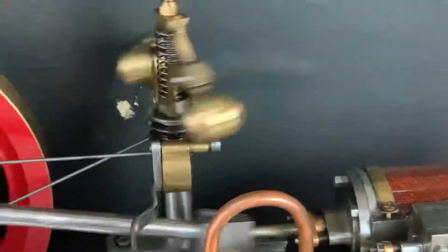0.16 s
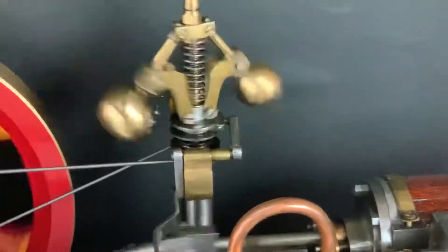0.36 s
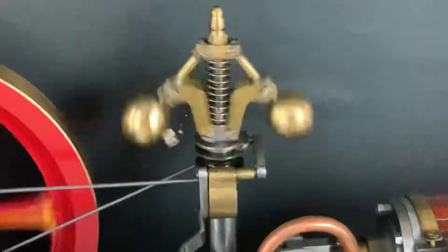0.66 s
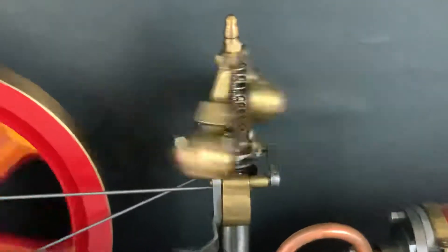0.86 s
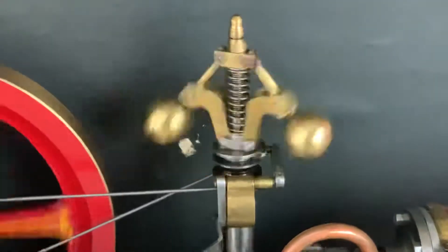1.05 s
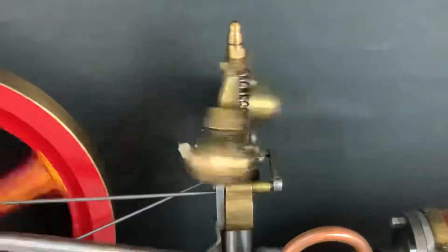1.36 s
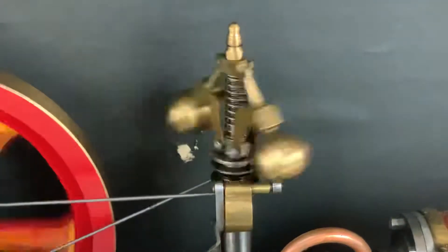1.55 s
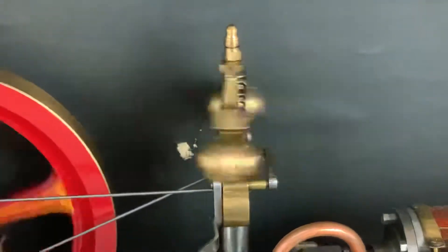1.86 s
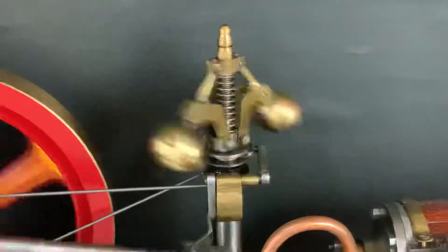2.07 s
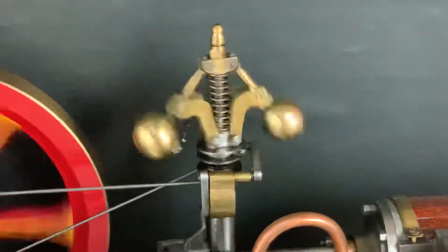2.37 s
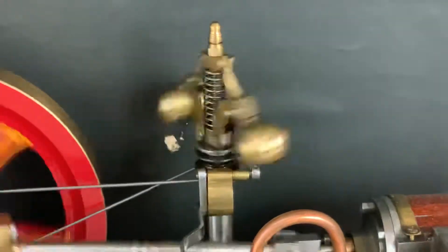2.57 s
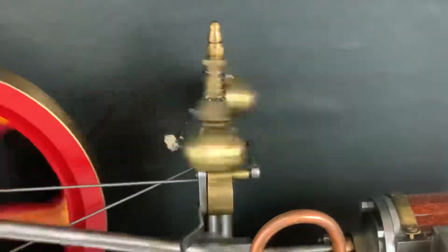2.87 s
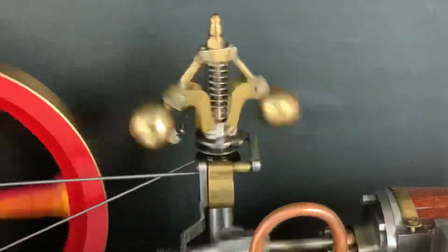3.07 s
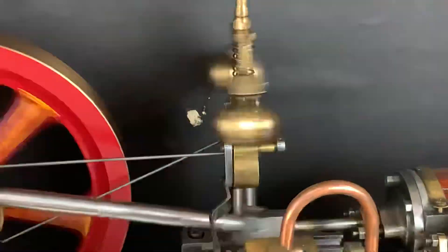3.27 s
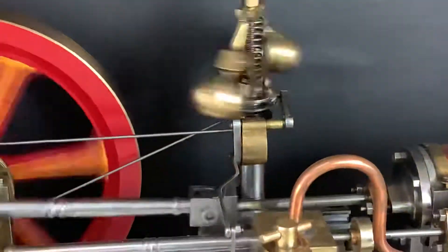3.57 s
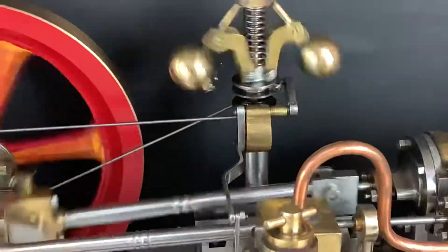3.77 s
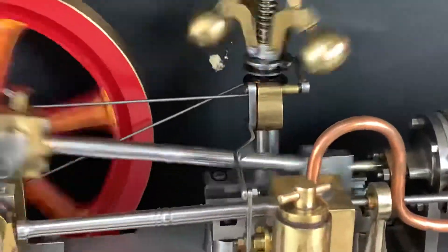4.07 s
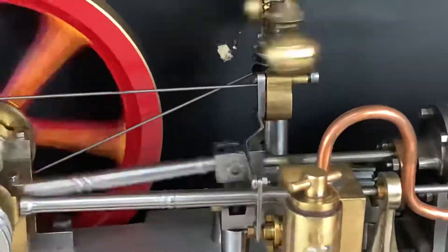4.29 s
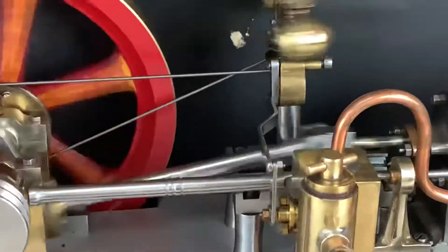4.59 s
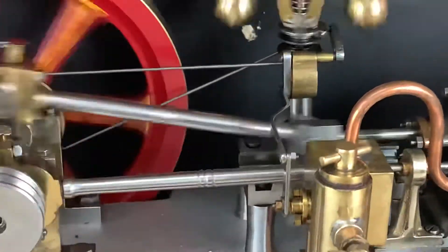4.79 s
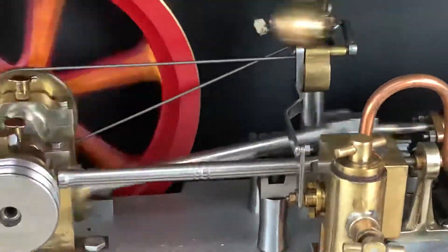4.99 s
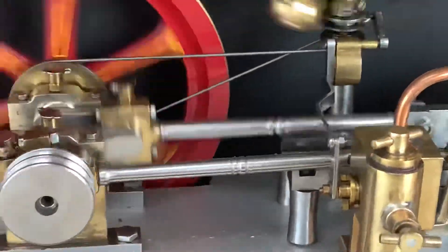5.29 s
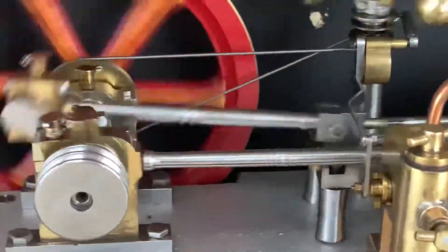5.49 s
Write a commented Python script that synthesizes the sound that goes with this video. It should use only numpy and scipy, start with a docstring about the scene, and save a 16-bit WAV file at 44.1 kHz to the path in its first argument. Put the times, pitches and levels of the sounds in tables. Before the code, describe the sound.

A small brass and steel model engine runs on a wooden table, recorded very close in stereo, indoors and dry. About two and a half turns per second, each a low woody thump, then a metallic tap, loose knocks and a clack. Underneath, gears whirr roughly, shafts and belt give a broad low rumble, and leaking air hisses to the right.

```python
"""On a wooden table, close to a phone with two ports, a small brass model steam engine runs.
Each crank turn brings a thump, a tap and a clack with loose knocks between. Timed force pushes ring
decaying modes of table top, legs and metal frame. Gears whirr as noise through narrow flickering resonances;
shafts, belt and room make a broad coloured noise, and an air leak hisses to the right in drifting bands."""
import sys
import numpy as np
from scipy import signal
from scipy.fft import rfft, irfft
from scipy.io import wavfile
from scipy.ndimage import uniform_filter1d

SR = 44100
rng = np.random.default_rng(int(sys.argv[2]) if len(sys.argv) > 2 else 0)


def digitize_waveform(pressure):
    """Quantize a signal to 16-bit integers and store it at the path in sys.argv[1].

    Rows of a 2-D input are taken as channels; values are limited to [-1, 1].
    """
    field = np.atleast_2d(pressure).T
    bounded = np.clip(field, -1, 1)
    quanta = np.round(bounded * 32767).astype(np.int16)
    wavfile.write(sys.argv[1], SR, quanta)


N = 248724
PRE = SR // 10  # samples of run-up, so that earlier blows ring on

# crank turns: thump_s, thump_db, clack_s, clack_db, strength_db (of the other knocks, taps and shoves)
TURNS = [(-0.0315, 0, 0.2048, -25, -1), (0.3367, -9.5, 0.5844, -25, -1.7),
         (0.7332, -0.2, 1.0012, -27, -1.5), (1.1489, 0.5, 1.4098, -24, -1.9),
         (1.5534, 0, 1.806, -25.5, -2.1), (1.946, -0.2, 2.1943, -26, -1.4),
         (2.3322, -0.1, 2.5789, -25.5, -1.1), (2.7148, -0.2, 2.9597, -25, -0.3),
         (3.0959, -0.2, 3.3422, -25.5, -0.4), (3.4787, -0.1, 3.7234, -25, 0.1),
         (3.8588, 0.9, 4.1027, -24, 0.3), (4.2379, 0, 4.4829, -25.5, 0), (4.6188, 0.4, 4.8643, -25, 0),
         (5.0002, 0.7, 5.246, -23.5, -0.1), (5.3822, 0.1, 5.6275, -26.5, -0.3)]
# crank angle of thump, valve, mid-stroke, crosshead and return: angle [share of a turn]
STAGES = [0, 0.1977, 0.429, 0.644, 0.736]


def amp(db):
    """Gain for a level in dB."""
    return 10 ** (np.asarray(db) / 20)


def level(x, db):
    """Scale to an RMS level in dB."""
    return x * amp(db) / np.sqrt(np.mean(x ** 2))


def ring(x, hz, t60):
    """One mode driven by x: a sine that falls 60 dB in t60 seconds."""
    pole = np.exp((2j * np.pi * hz - np.log(1000) / t60) / SR)
    return signal.lfilter([1], [1, -pole], x + 0j).imag[-N:]


def blows(times, sizes, push_s):
    """Raised-cosine force pushes of unit area times their size, with the run-up ahead."""
    force = np.zeros(N + PRE)
    at = np.round(np.asarray(times) * SR).astype(int) + PRE
    keep = (at >= 0) & (at < N + PRE)
    np.add.at(force, at[keep], np.asarray(sizes)[keep])
    push = np.hanning(int(push_s * SR) + 3)
    return np.convolve(force, push / push.sum())[:N + PRE]


def late(x, samples, turn=0.):
    """Delay by a fraction of samples, with an optional phase lead in radians."""
    return irfft(rfft(x) * np.exp(1j * turn - 2j * np.pi * np.fft.rfftfreq(N) * samples), N)


def coloured(points):
    """Noise with a spectrum drawn through (Hz, dB) points."""
    hz, db = np.transpose(points)
    shape = np.interp(np.log(np.fft.rfftfreq(N, 1 / SR) + 1), np.log(hz), db)
    return irfft(rfft(rng.standard_normal(N)) * amp(shape), N)


def walk(rate):
    """Random levels held 1 / rate s and smoothed twice, of about unit spread."""
    hold = int(SR / rate)
    steps = np.repeat(rng.standard_normal(N // hold + 1), hold)
    return 4 / 3 * uniform_filter1d(uniform_filter1d(steps, hold), hold)[:N]


def moments(angle):
    """When the crank passes this angle in each turn; it moves evenly between thumps and clacks."""
    thump, _, clack = np.transpose(TURNS)[:3]
    end = thump[-1] + (clack[-1] - thump[-1]) / STAGES[3]
    turns = np.arange(len(TURNS))
    known_angles = np.append(np.ravel([turns, turns + STAGES[3]], "F"), len(TURNS))
    known_s = np.append(np.ravel([thump, clack], "F"), end)
    return np.interp(turns + angle, known_angles, known_s)


def table():
    """Each stage of the turn passes its own few knocks into the table; harder knocks favour the high modes."""
    # knocks passed into the table: stage [index], delay_s, force_db, hardness [dB per octave], direction [sign]
    knocks = [(0, 0.0004, -23.8, -3, 1), (0, 0.0258, -50.9, 27, -1), (1, -0.0051, -52.1, 30, 1),
              (1, -0.0007, -47.8, 30, 1), (1, 0.0051, -39.9, 21, 1), (1, 0.0123, -31.1, -6, 1),
              (1, 0.0153, -47.5, 30, 1), (1, 0.0249, -51.0, 27, 1), (1, 0.0291, -38.7, -6, -1),
              (1, 0.0637, -54.1, 30, -1), (2, -0.004, -50.5, 30, -1), (2, 0.0032, -34.2, 9, 1),
              (2, 0.0078, -38.7, 24, -1), (2, 0.016, -32.4, 0, -1), (2, 0.022, -41.5, 6, -1),
              (2, 0.0434, -55.4, 30, -1), (3, -0.0037, -48.4, 30, -1), (3, 0.0003, -40.4, 24, 1),
              (3, 0.0033, -31.7, -6, 1), (3, 0.0065, -45.0, 30, 1), (3, 0.0141, -52.6, 30, -1),
              (4, -0.0112, -49.6, 30, -1), (4, -0.0038, -41.2, 0, -1), (4, 0.0004, -43.0, 24, 1),
              (4, 0.004, -33.3, 9, 1), (4, 0.0102, -41.7, 12, 1), (4, 0.0592, -51.7, 27, -1),
              (4, 0.0714, -39.3, 3, -1), (0, -0.0044, -41.4, 30, -1), (0, -0.0014, -43.3, 27, -1)]
    # knocks of the first three turns, at their own times:
    # time_s, force_db, hardness [dB per octave], direction [sign]
    timed_knocks = [(0.0405, -42.2, 30, -1), (0.0459, -30, 12, -1), (0.0468, -43.5, 30, -1),
                    (0.0524, -44.2, 30, -1), (0.0596, -28.7, 0, 1), (0.2071, -32.8, 0, -1),
                    (0.4154, -34, 22, 1), (0.4221, -30.1, 0, 1), (0.4279, -28.1, 0, 1),
                    (0.5071, -41.8, 30, 1), (0.5163, -38.7, 20, -1), (0.8169, -39.8, 20, 1),
                    (0.8263, -44.7, 30, 1), (0.829, -32, 4, 1), (0.8348, -32.8, 0, 1)]
    # table top modes: pitch_hz, t60_s, level_db, sign, left_lead [radians]
    modes = [(195, 0.127, 4.4, -1, 0.0), (224, 0.225, 7.1, 1, 0.0), (267, 0.073, -1.9, 1, 0.0),
             (287, 0.112, -7.5, 1, 0.1), (353, 0.101, -14.8, 1, 0.2), (456, 0.099, -19.1, -1, 0.5),
             (515, 0.025, -22.7, 1, 0.7)]
    gain_db, scatter_db, push_s, low_cut_hz = .8, 0.4, .0013, 165

    _, thump_db, _, _, knock_db = np.transpose(TURNS)
    rows = []
    for stage, delay, force, hard, way in knocks:
        turn_db = knock_db if stage else thump_db
        times = moments(STAGES[int(stage)]) + delay
        rows.append(np.broadcast_arrays(times, force + turn_db, hard, way))
    s, db, hard, way = np.concatenate(rows + [np.transpose(timed_knocks)], axis=1)
    db = db + gain_db + scatter_db * rng.standard_normal(len(s))

    out = 0
    for hz, t60, mode_db, sign, turn in modes:
        sizes = way * amp(db + mode_db + hard * np.log2(hz / 224))
        mode = sign * ring(blows(s, sizes, push_s), hz, t60)
        left = amp(.8 * (hz > 250))  # higher modes lean left, against the balance set in scene()
        out = out + np.array([mode * left, late(mode, 0, -turn) / left])
    # the small top sends little into the air below its lowest mode
    return signal.sosfiltfilt(signal.butter(5, low_cut_hz, "high", fs=SR, output="sos"), out)


def legs():
    """Slow shoves of piston and crank rock the table legs."""
    # table leg modes: pitch_hz, t60_s
    modes = [(48, 0.15), (75, 0.086), (115, 0.18), (138, 0.11)]
    # shoves of the moving masses: angle [share of a turn], direction [sign], then level_db into each leg mode
    shoves = [(0.015, -1, -34, -30.5, -31.5, -42), (0.206, -1, -43, -37.5, -30, -30),
              (0.468, 1, -40, -49, -27, -44), (0.752, 1, -44, -50, -28, -48)]
    shove_s = 0.0066
    strength = np.transpose(TURNS)[4]
    out = 0
    for angle, way, *mode_dbs in shoves:
        for db, (hz, t60) in zip(mode_dbs, modes):
            force = blows(moments(angle), np.sign(way) * amp(db + strength), shove_s)
            out = out + ring(force, hz, t60)
    return out


def strikes():
    """Taps, clacks and ticks of every turn: time s, dB, and whether the blow is a light one."""
    # light linkage ticks of each turn: angle [share of a turn], level_db
    ticks = [(0.082, -35.5), (0.298, -33), (0.358, -34.5), (0.44, -53.5), (0.567, -41), (0.765, -38.5),
             (0.836, -37.5), (0.925, -49.5)]
    tap_db, tap_scatter_db = -31.5, 0.5  # the valve gear taps once a turn
    tick_scatter_db, tick_scatter_s = 1.5, 0.00056

    _, _, clack_s, clack_db, strength = np.transpose(TURNS)
    chance = rng.standard_normal((len(TURNS), len(ticks) + 1, 2)).T
    taps = (moments(STAGES[1]), tap_db + strength + tap_scatter_db * chance[0, -1], False)
    rows = [taps, (clack_s, clack_db, False)]
    for k, (angle, db) in enumerate(ticks):
        times = moments(angle) + tick_scatter_s * chance[1, k]
        rows.append((times, db + tick_scatter_db * chance[0, k], True))
    return np.concatenate([np.broadcast_arrays(*row) for row in rows], axis=1)


def frame():
    """Metal on metal: each blow rebounds and rattles out; clacks and taps ring the frame otherwise than ticks do."""
    # brass and steel frame modes: pitch_hz, t60_s, heavy_blow_db, light_tick_db, left_lead [radians]
    modes = [(506, 0.072, -14.5, -6, 0.4), (642, 0.037, -12, -37, 0.82), (890.5, 0.038, -4.5, -1, 0.51),
             (1033, 0.025, 1, -8, 1.25), (1282.4, 0.044, -5, -3.5, 1.14), (1567, 0.061, -3.5, -19, 2.37),
             (1840, 0.05, -9, -25, 2.86), (2210, 0.023, 3, -38, 0.64), (2320, 0.0079, 1.5, 3, 1)]
    rebounds = [(.003, 0.00036, 0.4), (.009, 0.000823, 0.48), (.022, 0.004, 0.22)]  # after s, spread s, share

    s, db, light = strikes()
    colour = rng.standard_normal((len(s), len(modes)))  # dB, so that no two blows sound alike
    bounce = rng.standard_normal((len(s), len(rebounds)))
    out = 0
    for k, (hz, t60, heavy_db, light_db, turn) in enumerate(modes):
        size = (-1) ** k * amp(db + np.where(light, light_db, heavy_db) + colour[:, k])
        force = blows(s, 0.86 * size, 0.0001)
        for j, (after_s, spread_s, part) in enumerate(rebounds):
            force = force + blows(s + after_s + spread_s * bounce[:, j], part * size, 0.00026)
        mode = ring(force, hz, t60)
        out = out + np.array([mode, late(mode, 0, -turn)])
    return out


def whirr():
    """Rough rubbing of gears and bearings rings the frame resonances, each flickering by itself."""
    # rubbed resonances: pitch_hz, width_hz, level_db (per root Hz of width, relative),
    # left_lead [radians], move_gain_db (per unit of phone movement)
    resonances = [(513, 53, -11, 0.34, 2.5), (904, 33, -11.5, 0.78, 4.5), (1355, 150, -21, 0.56, 1),
                  (1609, 70, -7, 2.56, -4), (1780, 140, -14.5, 3.93, 5), (2171, 42.5, -4.5, 1.1, 3.5),
                  (2510, 39, -2.5, 0.55, -9), (2630, 63, -7, 3.8, -4), (2689, 19.4, 3.5, 1.07, -5),
                  (2712, 79, -1, 4.37, -4.5), (2955, 27, -9, 6.3, 6), (3177, 43, -2, 1.6, -4.5),
                  (3390, 174, -6.5, 2.2, -0.5), (3810, 74, -7.5, 4, -10), (3975, 51, -3, 1.72, 5.5),
                  (4357, 35, 1, 0.51, 1.5), (4520, 43, 0, 3.3, -2), (4743, 29, -3.5, 0.091, -3),
                  (5100, 90, -15, 3.2, 2), (5220, 32, -7.5, 0.85, -5), (5430, 150, -22, 2.5, 0),
                  (5850, 55, -13.5, 0.83, 11), (6180, 64, -10.5, 0.51, 5.5)]
    # movement of the phone along the engine: time_s, position [share of the way]
    move = [(0, -0.4), (.5, 0.076), (3, 0.18), (4.2, 0.76), (5.64, 1)]
    whirr_db, shared = -36, 0.95  # shared: part of the power common to both ports
    swell_db, swell_at = 0.25, 0.33  # swells once a turn, most at this crank angle

    t = np.arange(N) / SR
    moved = np.interp(t, *np.transpose(move))
    out = 0
    for hz, width, db, turn, gain_db in resonances:
        t60 = np.log(1000) / np.pi / width
        near = level(ring(rng.standard_normal(N), hz, t60), 0)
        loose = level(ring(rng.standard_normal(N), hz, t60), 0)
        common = np.sqrt(shared) * np.array([late(near, 0, turn), near])
        opposed = np.sqrt(1 - shared) * np.array([loose, -loose])
        flicker = amp(db + 1.95 * walk(14) + gain_db * moved)
        out = out + flicker * np.sqrt(width) * (common + opposed)
    angle = np.interp(t, moments(swell_at), np.arange(len(TURNS)))
    return level(out * amp(swell_db * np.cos(2 * np.pi * angle)), whirr_db)


def running():
    """Shafts, belt and room: one bass feeds both ports; above it part comes from the left, part from all round."""
    # broad running noise: pitch_hz, level_db (per Hz, relative)
    colour = [(25, -17), (44, -6), (55, -10), (80, -11), (115, -6.5), (158, -7), (215, -2), (400, -15.5),
              (680, -25), (1300, -12), (1650, -27), (1900, -24), (2500, -11), (4500, -8.5), (5300, -13),
              (5700, -8.5), (6800, -14), (10000, -22)]
    run_db, left_lead = -35.5, 12.7  # left_lead in samples

    near = coloured(colour)
    bass = signal.butter(2, 900, fs=SR, output="sos")
    treble = signal.butter(2, 900, "high", fs=SR, output="sos")
    low = signal.sosfiltfilt(bass, near) * amp(2.1 * walk(21))
    high = signal.sosfiltfilt(treble, near) * amp(2.3 * walk(24.94))
    airy = signal.butter(2, 2600, "high", fs=SR, output="sos")
    all_round = signal.sosfilt(airy, [coloured(colour), coloured(colour)])
    opposed = amp(-7.0) * coloured(colour)  # opposite in the two ports
    left = amp(8.0) * low + high + opposed
    right = amp(11.5) * low + late(high, left_lead) - opposed
    return level(np.array([left, right]) + amp(3.5 + 1.9 * walk(40)) * all_round, run_db)


def leak():
    """Escaping air, off to the right, each band drifting and flickering by itself."""
    # hiss colour: pitch_hz, level_db (per Hz, relative)
    colour = [(2500, -30), (5000, -9), (7000, -6), (8500, -5), (10200, -3), (11800, -1.5), (13200, 0),
              (14200, -3.5), (16000, -4)]
    # strength of the flow: time_s, level_db
    flow = [(0, -33.5), (1.5, -33.5), (2.999, -34), (3.8, -34), (4.8, -32.5), (5.64, -31.5)]
    # phase by which the right port leads: pitch_hz, lead [cycles]
    right_lead = [(0, 0), (5300, 1.5), (6500, 1.97), (7750, 2.3), (8700, 2.5), (9750, 2.87), (10750, 3.13),
                  (11800, 3.5), (12950, 3.86), (13750, 4.08), (14900, 4.5), (22050, 6.75)]
    # added right lead in the bands below 8.5 kHz as the phone moves: time_s, lead [cycles]
    lead_shift = [(0, 0), (3, 0), (4, -.13), (5.64, -.2)]
    # band edges: edge_hz
    edges = [2000, 4500, 6200, 8500, 10500, 12000, 13500, 16500]
    # right port over left in each band: right_db
    right_dbs = [-2, 12.5, 7.5, -2, 0.8, -1.5, 0.7]

    t, hz = np.arange(N) / SR, np.fft.rfftfreq(N, 1 / SR)
    air = rfft(coloured(colour))
    lagged = air * np.exp(-2j * np.pi * np.interp(hz, *np.transpose(right_lead)))
    shift = 2 * np.pi * np.interp(t, *np.transpose(lead_shift))
    out = 0
    for lo, hi, right_db in zip(edges, edges[1:], right_dbs):
        band = (hz >= lo) & (hz < hi)
        left = irfft(lagged * band, N)
        if hi < 9000:
            quarter_late = irfft(-1j * lagged * band, N)
            left = np.cos(shift) * left + np.sin(shift) * quarter_late
        pair = np.array([left * amp(-right_db), irfft(air * band, N)])
        out = out + amp(.5 * walk(4.3) + 1.14 * walk(10)) * pair
    return level(out, 0) * amp(np.interp(t, *np.transpose(flow)))


def scene():
    """Wood, metal, whirr, running noise and leak together."""
    wood, metal = table() + legs(), frame()
    # the wood reaches both ports almost together (right 4.5 samples later), with gain towards the right
    low = np.array([amp(-.8) * wood[0], amp(.8) * late(wood[1], 4.5)])
    return low + metal + whirr() + running() + leak()


def record(dry):
    """The phone drops the deepest bass and cuts the top."""
    dry = signal.sosfilt(signal.butter(8, 42, "high", fs=SR, output="sos"), dry)
    return signal.sosfilt(signal.ellip(16, .3, 80, 15700, fs=SR, output="sos"), dry)


dry = scene()
out = record(dry)
digitize_waveform(out)
```